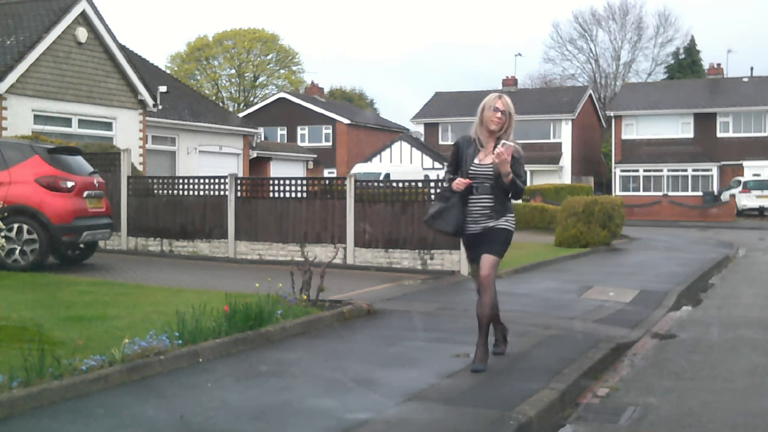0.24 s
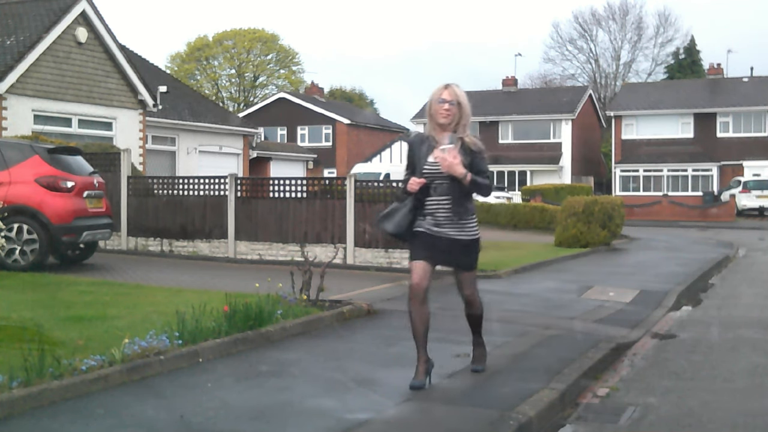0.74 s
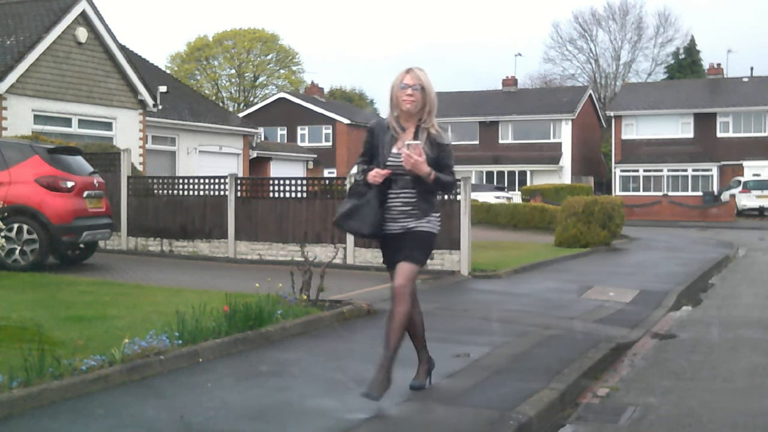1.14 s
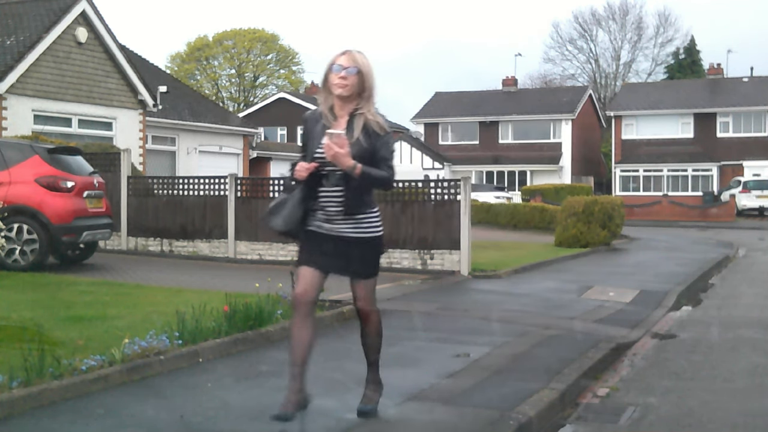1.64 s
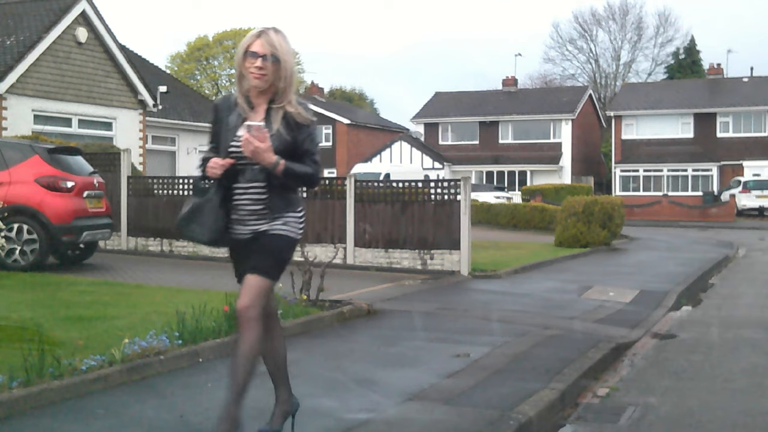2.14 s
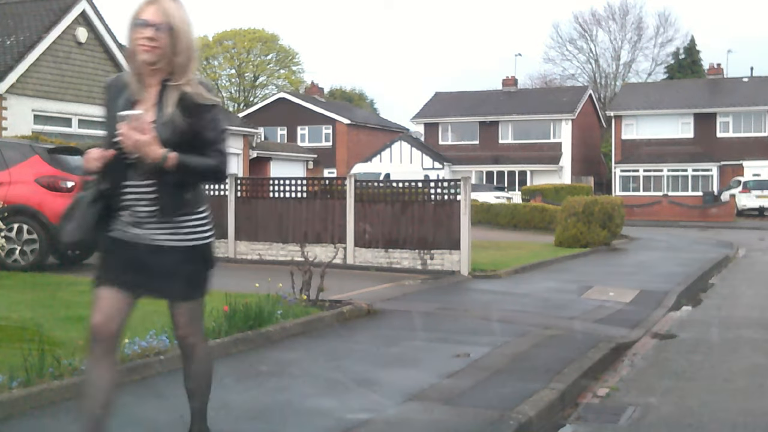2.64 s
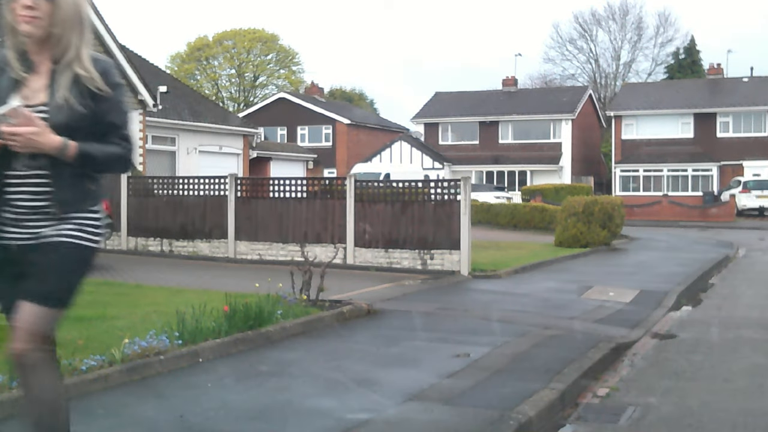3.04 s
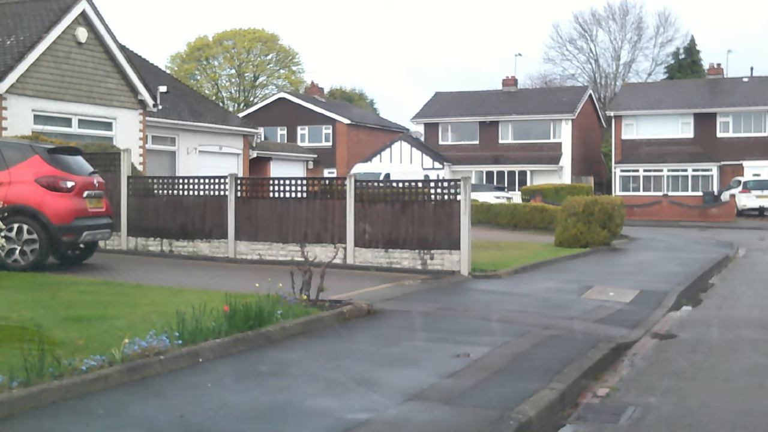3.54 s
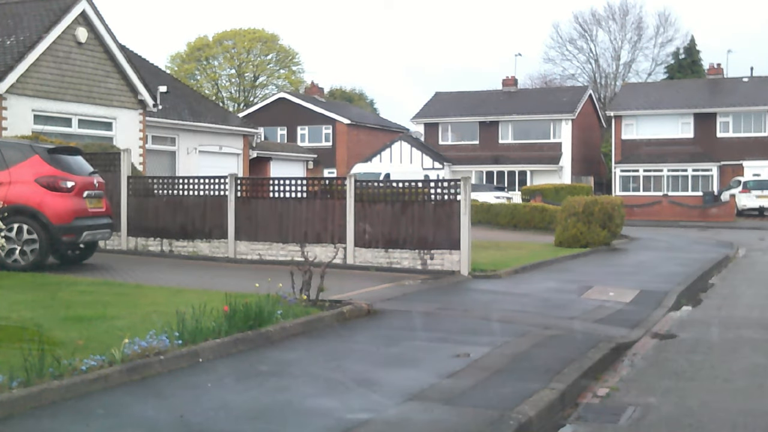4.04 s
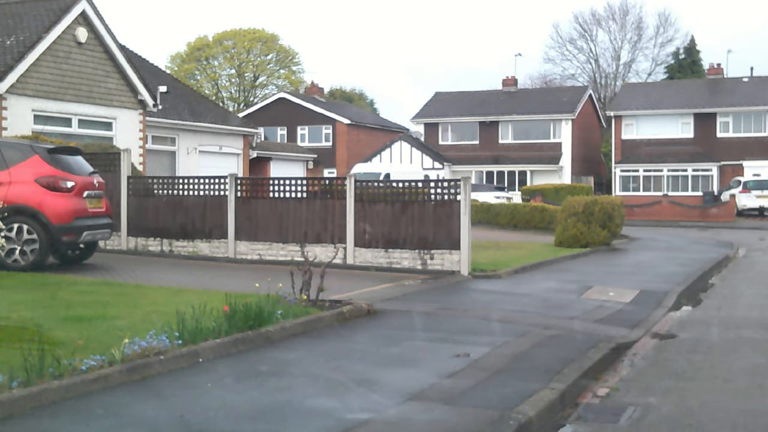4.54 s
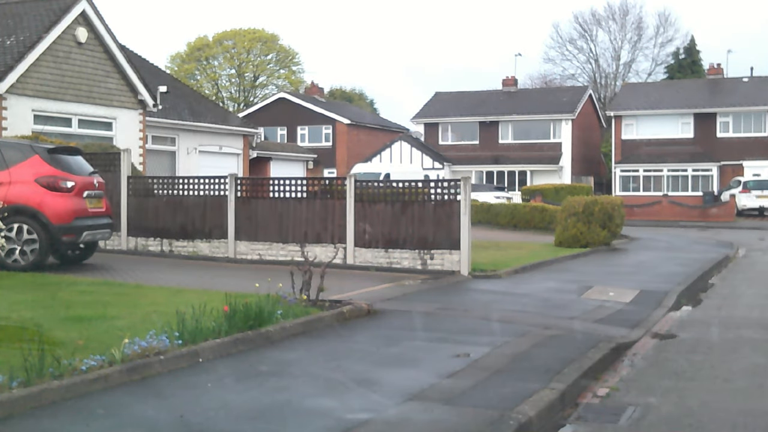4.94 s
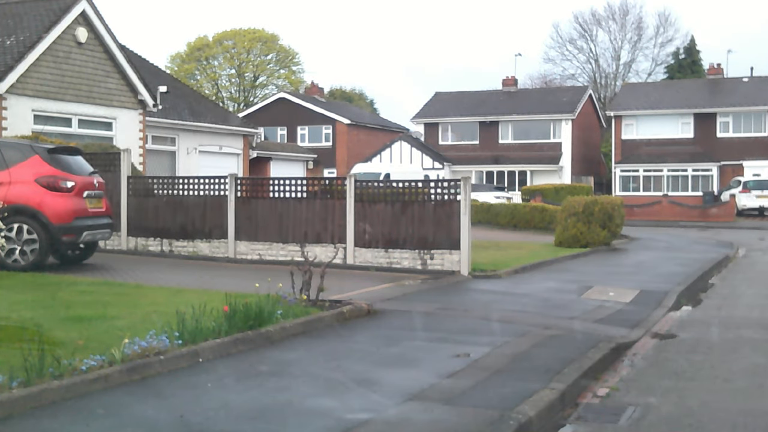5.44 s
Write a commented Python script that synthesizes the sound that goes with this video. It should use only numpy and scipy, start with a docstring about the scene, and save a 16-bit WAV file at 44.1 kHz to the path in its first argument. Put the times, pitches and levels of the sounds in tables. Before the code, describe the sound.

High heels knock steadily along a wet pavement in a quiet street, with low wind rumble on the microphone and distant traffic.

```python
"""High heels knock along a wet pavement as a woman walks past a camera in a quiet street.
Each heel strike rings the shoe, dull and hollow, the sole crushes a little grit, and house fronts
throw it back. Wind rumbles on the microphone over a low drone and distant traffic, and a far bird
chirps. The camera whines faintly, and its small motor buzzes the case five times a second."""
import sys
import numpy as np
from scipy import signal
from scipy.fft import rfft, irfft
from scipy.io import wavfile
from scipy.ndimage import uniform_filter1d

SR = 44100
rng = np.random.default_rng(int(sys.argv[2]) if len(sys.argv) > 2 else 0)


def store_pcm(level_fs):
    """Save levels as 16-bit WAV."""
    pcm = np.round(np.clip(level_fs, -1, 1) * 32767).astype(np.int16)
    wavfile.write(sys.argv[1], SR, np.atleast_2d(pcm).T)


N = 250929
TIME, FREQS = np.arange(N) / SR, np.fft.rfftfreq(N, 1 / SR)

# heel strikes, plus two off-beat knocks in mid stride: start_s, contact_s, knock_db, thud_db, clack_db
WALK_HITS = [(0.189, 0.012, -59, -69, -60.5), (0.687, 0.038, -57.5, -69, -62),
             (0.976, 0.018, -58.5, -51, -68), (1.212, 0.013, -59.5, -81, -74),
             (1.690, 0.026, -52, -55.5, -57), (2.229, 0.016, -62.5, -76, -57.5),
             (2.696, 0.05, -61, -61.5, -60.5), (3.222, 0.02, -58.5, -60, -58),
             (3.526, 0.015, -61, -72, -69.5), (3.685, .015, -50.5, -58, -58),
             (4.208, 0.03, -61, -62.5, -67), (4.699, 0.012, -50.5, -57, -64), (5.215, 0.019, -54, -47, -61)]
# the shoe's hollow ring: pitch_hz, gain_db, t60_s
SHOE_MODES = [(259, -7, 0.078), (348.7, 4, .07), (438, 3, 0.052), (538, -14, 0.022), (606, -3, 0.073),
              (677, -7, 0.13), (890, -16.5, 0.026), (923, -17, 0.01)]
# a shoe dragging on grit: start_s, length_s, level_db, centre_hz
SHOE_DRAGS = [(0.67, 0.024, -65.5, 680), (2.732, 0.029, -73.5, 2270), (4.179, 0.06, -72, 805),
              (4.674, 0.022, -67, 710), (4.79, 0.039, -66, 393), (5.205, 0.05, -60.5, 680),
              (5.214, 0.024, -66.5, 1970)]
# slapback from fences and house fronts: delay_s, gain_db
SLAPBACKS = [(.028, -17.5), (.054, -17.5), (.072, -20.5), (.11, -26.5)]
# tone of the wind on the microphone: freq_hz, gain_db
WIND_SPECTRUM = [(4, -14.5), (15, 5), (25, -6.5), (33, -21), (42, -13), (52, -21.5), (80, -34),
                 (200, -68.5), (800, -140)]
# the wind's strength: time_s, level_db
WIND_GUSTS = [(0, -50.5), (0.3, -51), (0.42, -34), (0.58, -47.5), (0.8, -53.5), (1.9, -52.5), (2.65, -45),
              (3.3, -50.5), (4.1, -43.5), (4.4, -52), (4.6, -40), (4.9, -51.5), (5.69, -48.5)]
# the two narrow bands of the drone's throb: centre_hz, width_hz, gain_db
THROB_TONES = [(54.05, 1.3, -4), (62.86, 3.3, -1.5)]
# fader rides for the drone's throb, hum and overtone: time_s, gain_db
THROB_RIDE = [(0, -58), (.6, -64), (1.1, -54.5), (2.25, -53.5), (3.2, -57), (3.6, -49.5), (5.05, -58),
              (5.45, -52)]
HUM_RIDE = [(0, -67), (.85, -74), (1.7, -58), (2.8, -62.5), (3.1, -68.5), (3.7, -63), (4.8, -63),
            (5.5, -58)]
OVERTONE_RIDE = [(0, -67.5), (1.35, -72), (2, -62.5), (3.4, -72), (4.8, -65), (5.08, -55), (5.4, -63.5),
                 (5.69, -58)]
# the bird's calls: start_s, length_s, start_hz, end_hz, level_db
BIRD_CHIRPS = [(1.243, .02, 2730, 2680, -82.5), (1.391, .03, 2370, 2310, -81.5),
               (1.775, 0.19, 2370, 2004, -81.5), (2.172, 0.034, 2410, 2450, -83)]
# fader ride for the motor's buzz: time_s, gain_db
MOTOR_RIDE = [(0, -81), (2.7, -79), (4.9, -78), (5.5, -86)]
# broad tone of the camera's case: freq_hz, gain_db
CASE_SPECTRUM = [(600, -33), (1500, 2), (2800, 1.5), (3600, -11.5), (4100, -12.5), (4550, -12),
                 (5100, -24.5), (6000, -15), (6450, -0.5), (7000, 1.5), (7600, -0.5), (7950, -8.5),
                 (8200, -44.5)]
# the case's thin rings: pitch_hz, width_hz, boost_db
CASE_MODES = [(6600, 88, 4), (7240, 16, 5), (7520, 13, 8)]
# the camera's thin whines: pitch_hz, level_db
CAMERA_WHINES = [(2777, -100), (7245, -102), (7411, -101)]
# tone of the street's steady wash: freq_hz, gain_db
STREET_SPECTRUM = [(40, 5), (90, 0), (180, -1.5), (250, -7.5), (400, -11), (550, -17.5), (750, -18.5),
                   (1000, -23), (2100, -29.5), (3000, -35), (4000, -44.5), (5000, -53.5), (6000, -46),
                   (6900, -37), (7650, -43), (8300, -57)]


def walk(thud_t60_s=.11, clack_t60_s=.05, clack_hz=725, chatter_per_s=1500, soft_hz=880):
    """Heel strikes and two off-beat knocks: a blow and its chatter ring a knock, a thud and a clack."""
    toward_hz, away_hz, passes_at_s = 195.7, 296.3, 4  # the thud is higher once she has gone past
    soften = signal.butter(4, soft_hz, fs=SR, output="sos")  # rounds off the blow
    out, t = np.zeros(N), np.arange(SR // 4) / SR
    for start_s, contact_s, knock_db, thud_db, clack_db in WALK_HITS:
        taps = rng.standard_normal(len(t)) * (rng.random(len(t)) < chatter_per_s / SR)
        force = taps / (1 + (t / (1.1 * contact_s)) ** 6)  # the chatter stops as the contact settles
        force /= np.linalg.norm(force) + 1e-9
        force[0] += .012 / contact_s  # the strike: a shorter contact hits harder
        force = signal.sosfilt(soften, force)
        knock = unit_attack(sum(amp(db) * shoe_ring(force, hz, t60) for hz, db, t60 in SHOE_MODES))
        thud = shoe_ring(force, toward_hz if start_s < passes_at_s else away_hz, thud_t60_s)
        clack = shoe_ring(force, clack_hz, clack_t60_s)
        add(out, start_s, amp(knock_db) * knock + amp(thud_db) * thud + amp(clack_db) * clack)
    return out


def shoe_ring(force, hz, t60_s):
    """A force rings one damped mode of the shoe, trimmed to a band around its pitch."""
    t = np.arange(len(force)) / SR
    mode = np.sin(2 * np.pi * hz * t) * amp(-60 * t / t60_s)
    ringing = signal.fftconvolve(force, mode)[:len(t)]
    band = signal.butter(2, [hz / 1.6, hz * 1.3], "bandpass", fs=SR, output="sos")
    return unit_attack(signal.sosfilt(band, ringing))


def grit(width_octaves=.44, grain_db=3, sole_lag_s=.028, sole_length_s=.036, sole_hz=700):
    """Grains of grit crushed under the sole, at every step and where a shoe drags."""
    out, count = np.zeros(N), SR // 8
    # a rasp trails each hit, louder the longer the contact
    soles = [(start_s + sole_lag_s, sole_length_s, -78 + 201 * contact_s, sole_hz)
             for start_s, contact_s, *_ in WALK_HITS]
    for start_s, length_s, level_db, centre_hz in soles + SHOE_DRAGS:
        grains = rng.standard_normal(count) * amp(grain_db * rng.exponential(1, count))
        octaves_off = np.log2((np.fft.rfftfreq(count, 1 / SR) + 1) / centre_hz)
        band = np.exp(-(octaves_off / width_octaves) ** 2 / 2)
        rasp = unit(irfft(rfft(grains) * band, count))[:int(length_s * SR)]
        add(out, start_s, amp(level_db) * rasp * signal.windows.tukey(len(rasp), .6))
    return out


def house_echoes(sound, tail_db=-16, t60_s=.64, build_s=.046):
    """Fences and house fronts add a few slapbacks and a thin outdoor tail to the dry sound."""
    t = np.arange(SR) / SR
    tail = rng.standard_normal(SR) * amp(-60 * t / t60_s) * np.clip(t / build_s, 0, 1)
    response = amp(tail_db) * tail / np.linalg.norm(tail)
    for delay_s, gain_db in SLAPBACKS:
        add(response, delay_s, amp([gain_db]))
    return sound + signal.fftconvolve(sound, response)[:N]


def wind():
    """Lumps of pressure buffet the microphone, rising and falling with the gusts."""
    lumps = even_out(noise(colour(WIND_SPECTRUM)), SR // 4)
    return lumps * fader(WIND_GUSTS)


def drone():
    """A wavering low throb, hum and overtone, like an engine idling far off."""
    throb = sum(amp(db) * wavering_tone(hz, width_hz) for hz, width_hz, db in THROB_TONES)
    hum = wavering_tone(hz=101.2, width_hz=.91)
    overtone = wavering_tone(hz=132.4, width_hz=8.1)
    return fader(THROB_RIDE) * throb + fader(HUM_RIDE) * hum + fader(OVERTONE_RIDE) * overtone


def bird(waver=.037):
    """A far bird whistles short, slightly unsteady glides."""
    out = np.zeros(N)
    for start_s, length_s, start_hz, end_hz, level_db in BIRD_CHIRPS:
        count = int(length_s * SR)
        wobble = unit(uniform_filter1d(rng.standard_normal(SR // 4), 150))[:count]
        pitch_hz = np.linspace(start_hz, end_hz, count) * (1 + waver * wobble)
        whistle = np.sin(2 * np.pi * np.cumsum(pitch_hz) / SR) * np.hanning(count)
        add(out, start_s, amp(level_db) * unit(whistle))
    return out


def camera_motor(first_s=.0955, every_s=.2, burst_s=.053, tick_hz=150, rub=.31, pip_hz=3466):
    """Each burst is a short run of uneven ticks and rubbing that rings the case, plus a thin pip."""
    stall_at_s, stall_s, delay_share = 3, .047, .45  # one stall; each burst keeps a share of the delay
    starts = np.arange(first_s, N / SR, every_s)
    late = starts > stall_at_s
    starts[late] += stall_s * delay_share ** np.arange(late.sum())
    drive, pips, t = np.zeros(N), np.zeros(N), np.arange(int(burst_s * SR)) / SR
    turns = t * tick_hz
    tick_decay = np.exp(-(turns % 1) / .27)
    pip = np.sin(2 * np.pi * pip_hz * t) * signal.windows.tukey(len(t), .5)
    for start_s in starts:
        tick_size = amp(rng.uniform(-8.7, 3, 64))[turns.astype(int)]
        buzz = (rub + tick_size * tick_decay) * rng.standard_normal(SR // 4)[:len(t)]
        add(drive, start_s, amp(.5) * unit(buzz))
        add(pips, start_s, amp(-86.5 - .4 * start_s) * pip)  # the pips slowly fade
    return pips + fader(MOTOR_RIDE) * camera_case(drive)


def camera_case(drive):
    """The case colours the motor's vibration and adds a few thin, high rings."""
    response = colour(CASE_SPECTRUM)
    for hz, width_hz, boost_db in CASE_MODES:
        resonance = 1 / (1 + 2j * (FREQS - hz) / width_hz)
        response = response * (1 + (amp(boost_db) - 1) * resonance)
    return irfft(rfft(drive) * unit(response), N)


def camera_whine(width_hz=10):
    """Faint, unsteady whistles from the running camera."""
    return sum(amp(db) * narrow_noise(hz, width_hz) for hz, db in CAMERA_WHINES)


def street(level_db=-59, drift_db=.05, low_cut_hz=35):
    """An almost steady bed of distant traffic and faint microphone hiss."""
    low_cut = FREQS ** 4 / (FREQS ** 4 + low_cut_hz ** 4)
    wash = noise(colour(STREET_SPECTRUM) * low_cut)
    slow_drift = noise(1 / (1 + (FREQS / 3) ** 4))
    return amp(level_db + drift_db * slow_drift) * wash


def wavering_tone(hz, width_hz):
    """A tone that wavers while its long-term level holds even."""
    return even_out(narrow_noise(hz, width_hz), SR // 3)


def narrow_noise(hz, width_hz):
    """A bell-shaped band of noise at rms 1."""
    return noise(np.exp(-((FREQS - hz) / width_hz) ** 2))


def noise(spectrum):
    """Noise of rms 1 with the given spectrum."""
    return unit(irfft(rfft(rng.standard_normal(N)) * spectrum, N))


def colour(points):
    """An EQ curve: a gain for every frequency from (freq_hz, gain_db) points."""
    hz, db = np.transpose(points)
    return amp(np.interp(np.log(FREQS + 1), np.log(hz + 1), db))


def fader(points):
    """A gain for every moment from (time_s, gain_db) points."""
    return amp(np.interp(TIME, *np.transpose(points)))


def amp(db):
    """Decibels to gain."""
    return 10 ** (np.asarray(db) / 20)


def unit(x):
    """Scales to rms 1."""
    return x / np.sqrt(np.mean(abs(x) ** 2) + 1e-30)


def unit_attack(x):
    """Scales a hit so that its first 40 ms have rms 1."""
    return x / np.sqrt(np.mean(x[:SR // 25] ** 2))


def even_out(x, window_samples):
    """Holds the running rms near 1."""
    return x / np.sqrt(uniform_filter1d(x ** 2, window_samples))


def add(mix, start_s, sound):
    """Mixes a sound in at a time."""
    part = mix[max(round(start_s * SR), 0):][:len(sound)]
    part += sound[:len(part)]


def scene():
    """Steps and bird among the houses, over street, wind, drone and the camera's own noise, in mono."""
    echoing = house_echoes(walk() + grit() + bird())
    return (echoing + street() + wind() + drone() + camera_motor() + camera_whine())[None]


def record(dry, top_hz=8200, hiss_db=-100, band_limit_hz=15800):
    """A dull microphone channel, a trace of electronic hiss, then the band limit."""
    eased = dry * signal.windows.tukey(N, .003)
    dull = signal.oaconvolve(eased, signal.firwin(201, top_hz, fs=SR)[None], "same")
    hissy = dull + amp(hiss_db) * rng.standard_normal(N)
    band_limit = signal.firwin(401, band_limit_hz, window=("kaiser", 8), fs=SR)
    return signal.oaconvolve(hissy, band_limit[None], "same")


dry = scene()
out = record(dry)
store_pcm(out)
```